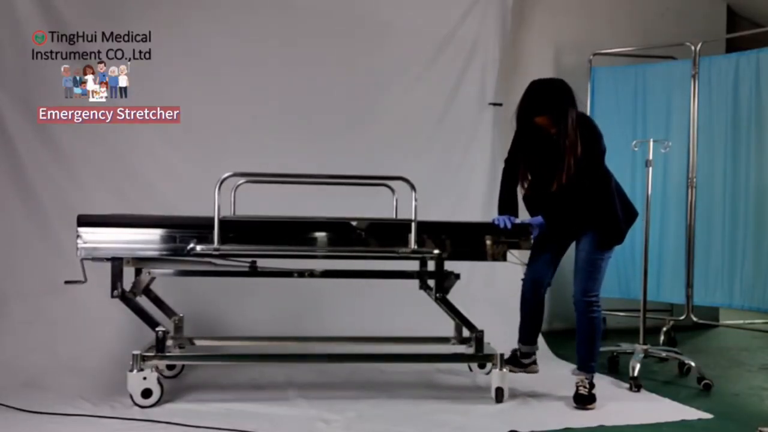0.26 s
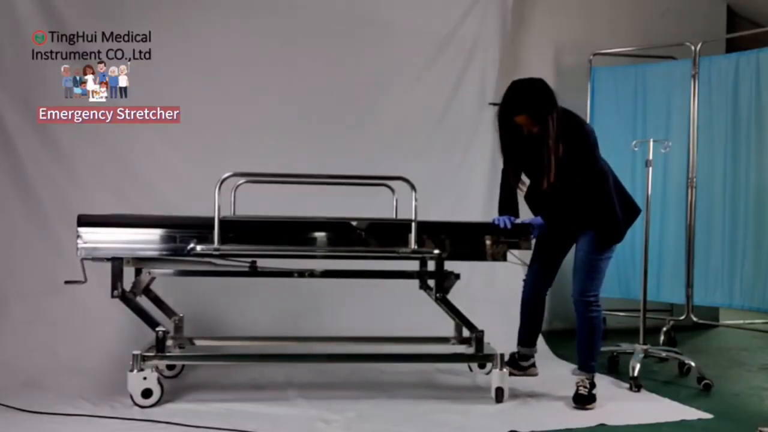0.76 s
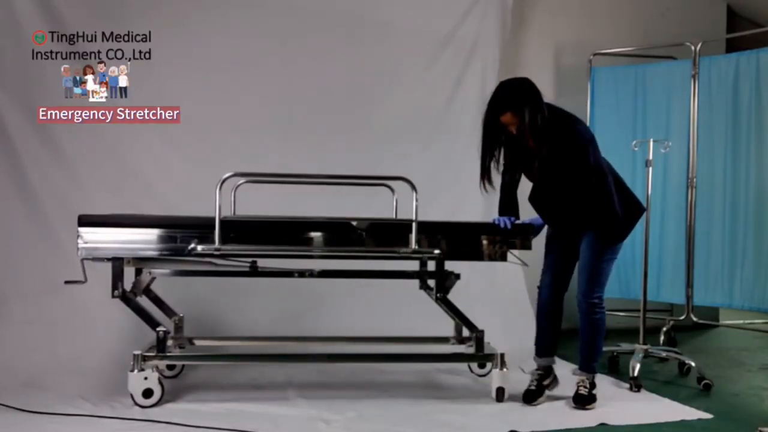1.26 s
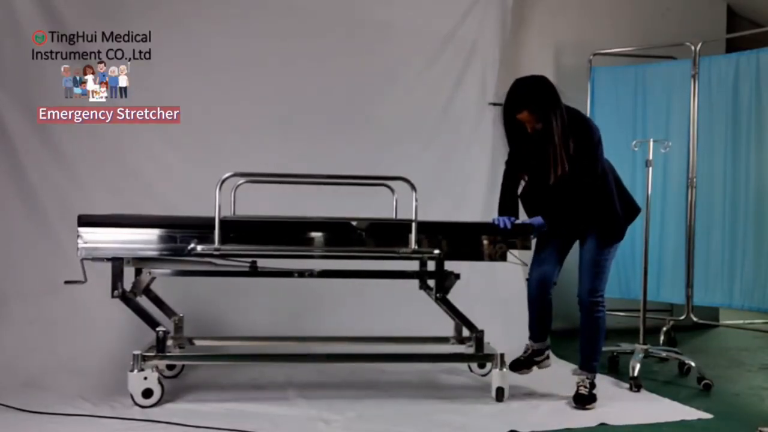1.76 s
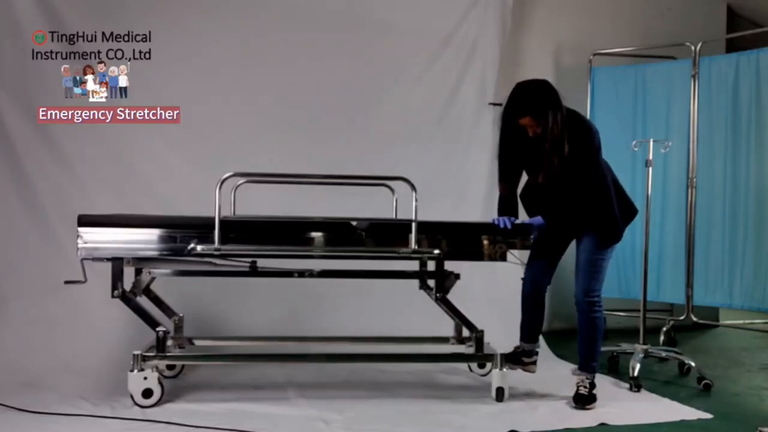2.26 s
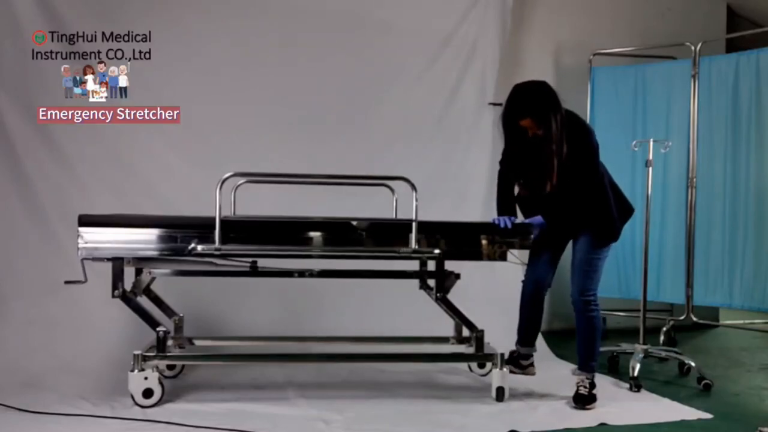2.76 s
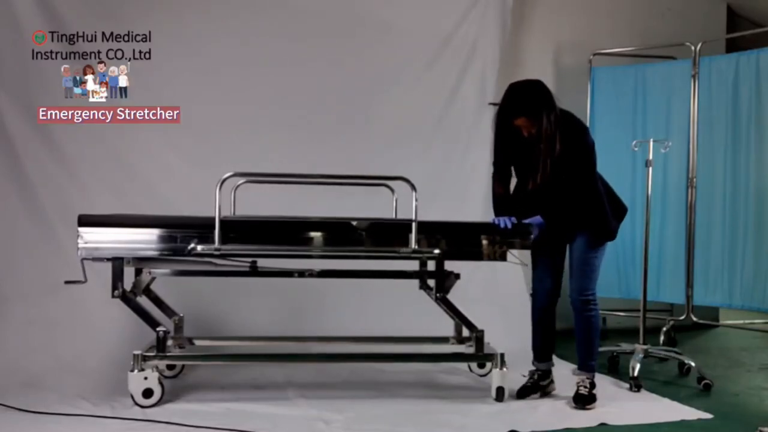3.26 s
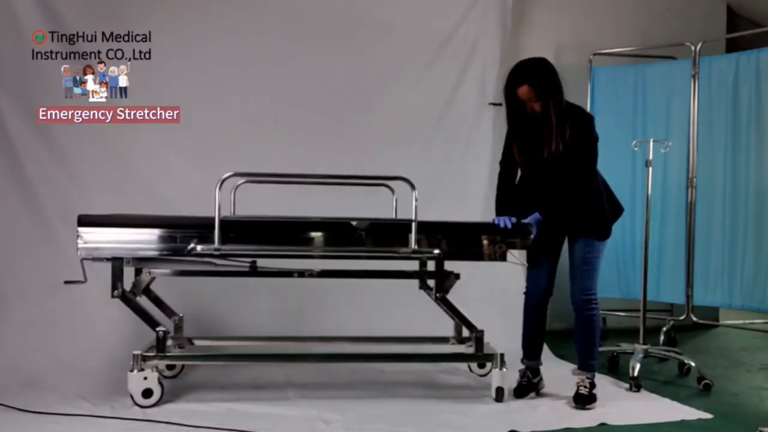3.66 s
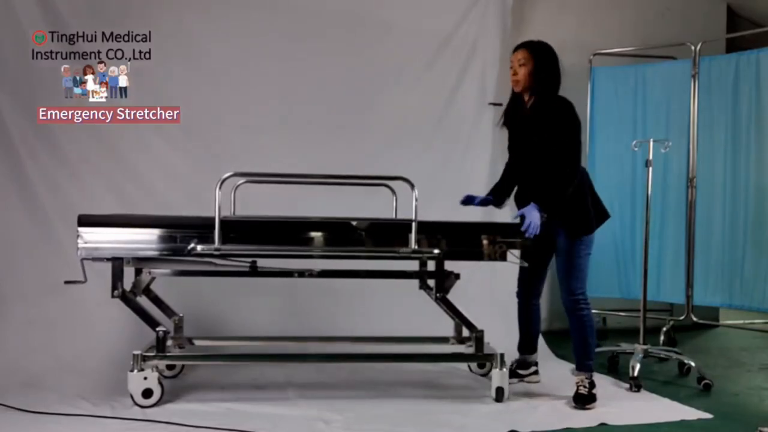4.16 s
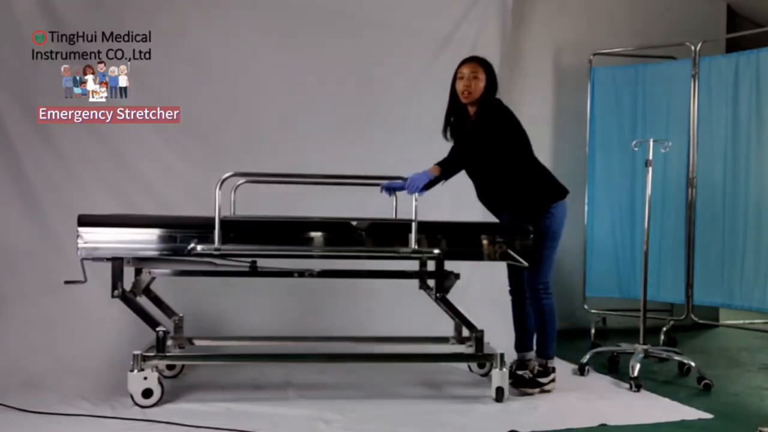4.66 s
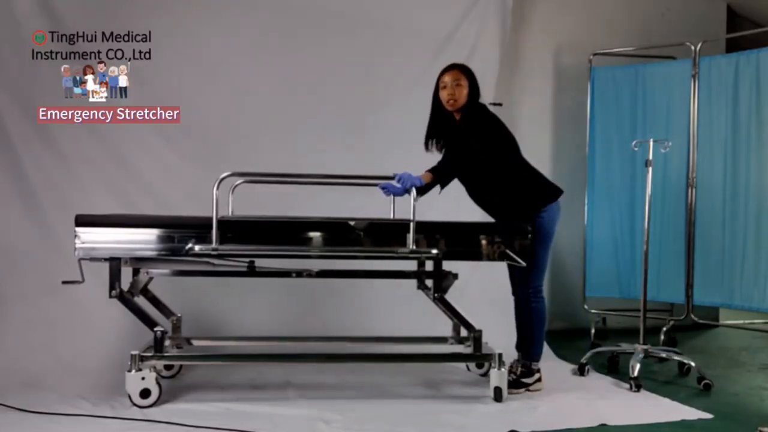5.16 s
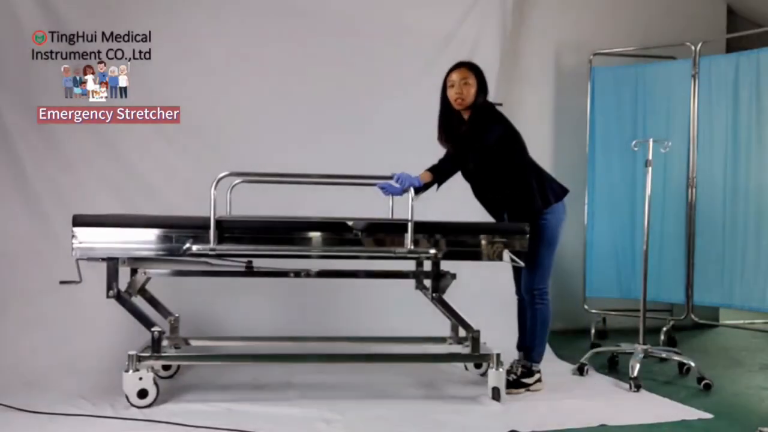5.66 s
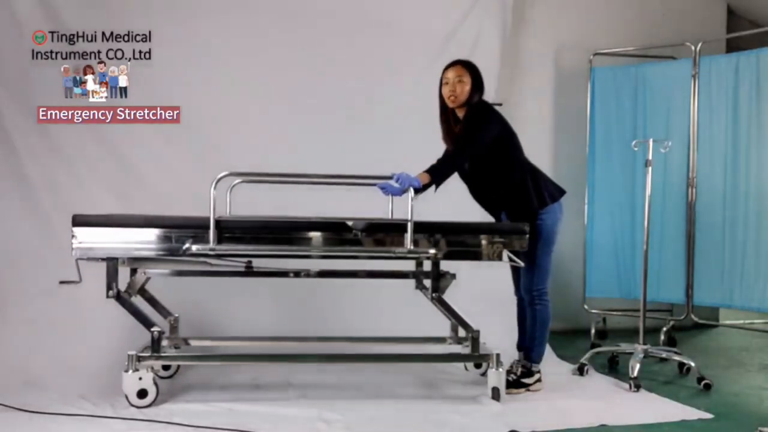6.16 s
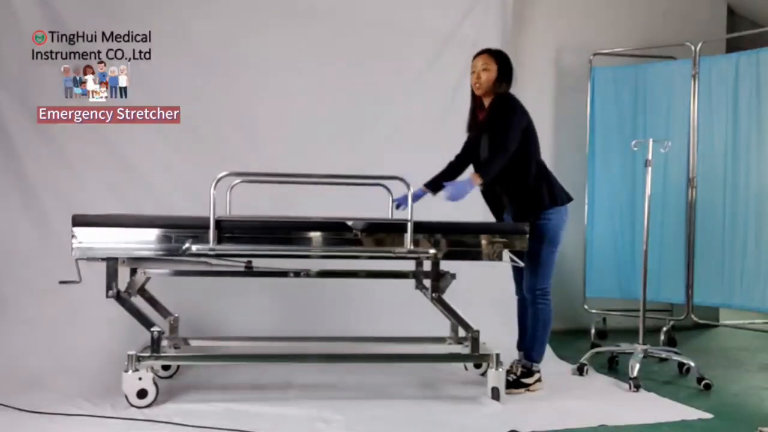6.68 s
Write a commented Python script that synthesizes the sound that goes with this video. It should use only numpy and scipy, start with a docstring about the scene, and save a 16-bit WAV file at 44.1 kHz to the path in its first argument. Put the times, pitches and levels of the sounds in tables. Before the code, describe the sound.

Sharp metallic brake clacks with loose chatter, two tiny glove squeaks, then a flurry of hollow steel rail knocks over soft room noise.

```python
"""Over quiet drifting room noise and a faint hum, a treble hiss swells and dies at the start.
Shoe and glove tick faintly on a steel stretcher; a foot lets its caster brake up, later presses it down.
A glove squeaks twice on the side rail, then a hand shakes it; a long frame tube rings, holds, drops quickly.
Blows are a crack, a noise rattle and decaying tube modes; loose parts are dense random impacts.
A bare room echoes them; the colours include a small microphone's peak near 8 kHz and weak bass."""
import sys
import numpy as np
from scipy import signal
from scipy.io import wavfile
from scipy.ndimage import uniform_filter1d

SR = 44100
rng = np.random.default_rng(int(sys.argv[2]) if len(sys.argv) > 2 else 0)


def master(y):
    """Save y as 16-bit WAV."""
    cut = np.clip(np.atleast_2d(y).T, -1, 1)
    pcm = np.round(cut * 32767)  # scale
    wavfile.write(sys.argv[1], SR, pcm.astype(np.int16))


def linear_from_db(decibels):
    """Turn decibels (scalar or array-like) into linear amplitude factors; 0 gives 1."""
    return 10 ** (np.asarray(decibels, float) / 20)


N = 305172

# brake pedal and light touches at the microphone, relative: freq_hz, density_db_per_hz
PRESS_COLOUR = [(59, -37.5), (100, -7.5), (240, 5), (343, 2.5), (481, -2.5), (634, 7), (854, 0.5),
                (1200, 5), (2370, 0), (3800, -7.5), (5770, -19), (8460, 3.5), (11000, -13), (14100, -12.5),
                (16000, -22)]
# steel tube modes, levels relative before tilt: centre_hz, level_db, t60_s
TUBE_MODES = [(307, -17.5, 0.073), (350, -20.5, 0.15), (846.4, -8, 0.23), (891.7, 0.5, 0.092),
              (1002.5, -10, 0.2), (1434, -1.5, 0.052), (1786, -23, 0.32), (2080, -3.5, 0.024),
              (2350, -28, 1), (4080, -21, 0.45), (6850, -13.5, 0.25), (7420, -14.5, 0.56), (7500, -9, 0.15),
              (8320, -9.5, 0.37), (8500, -20.5, 0.19), (8700, -20, 0.23), (13400, -24, 0.068)]


def evened(x):
    """Scales to rms 1."""
    return x / np.sqrt(np.mean(x ** 2) + 1e-20)


def read(points, hz):
    """Reads a spectrum on a log-frequency axis."""
    f, value = np.transpose(points)
    return np.interp(np.log(hz + 1), np.log(f + 1), value)


def add(mix, start_s, sound):
    """Mixes a sound in at start_s."""
    part = mix[round(start_s * SR):][:len(sound)]
    part += sound[:len(part)]


def wander(t, step_s, count):
    """Random values, linear between normal draws step_s apart."""
    return np.interp(t, np.arange(count) * step_s, rng.standard_normal(count))


def noise(colour, patchy_db):
    """Coloured noise from random short-time spectra with drifting patches, rms 1."""
    hz = np.fft.rfftfreq(1024, 1 / SR)
    real, imag, patches = rng.standard_normal((N // 256 + 5, 513, 3)).T
    patches = uniform_filter1d(patches, size=12, axis=0)
    patches = evened(uniform_filter1d(patches, size=14, axis=1))
    gain_db = read(colour, hz)[:, None] + patchy_db * patches
    spectra = (real + 1j * imag) * linear_from_db(gain_db)
    return evened(signal.istft(spectra, nperseg=1024, noverlap=768)[1][:N])


def room_noise():
    """Broadband air noise whose level drifts."""
    # air noise: freq_hz, density_db_per_hz
    air_colour = [(29, -65), (50, -38.5), (85, -4.5), (211, -4), (244, -3), (341, -11), (551, -8.5),
                  (637, -20), (735, -12), (957, -19), (1740, -25), (2690, -31.5), (5930, -37.5),
                  (7920, -21), (11500, -36.5), (15500, -40.5)]
    # air noise drift: time_s, level_db
    air_drift = [(0, -49.5), (.5, -53), (2.2, -53.5), (3.2, -59.5), (4.2, -55), (5, -56), (6.92, -53.5)]
    time_s, level_db = np.transpose(air_drift)
    return linear_from_db(np.interp(np.arange(N) / SR, time_s, level_db)) * noise(air_colour, patchy_db=0.7)


def machinery_hum():
    """Distant machinery: sines wavering quickly and slightly in level and phase."""
    # hum tones: freq_hz, mean_level_db
    hum_tones = [(549.1, -70), (729, -69), (850.6, -72.5)]
    t = np.arange(N) / SR
    out = np.zeros(N)
    for hz, db in hum_tones:
        level = linear_from_db(db + 1.3 * wander(t, 1 / 25, 300))
        cycles = hz * t + 0.073 * wander(t, 1 / 25, 300)
        out += level * np.sin(2 * np.pi * cycles)
    return out


def opening_hiss():
    """Treble noise: steady, swells, then fades."""
    # hiss: freq_hz, density_db_per_hz
    hiss_colour = [(1470, -20), (2500, -18), (3570, -24), (4800, -9.5), (5440, -23), (6550, -9.5),
                   (8330, 0.5), (9010, -6.5), (11600, -16.5), (15300, -21), (16000, -23)]
    steady_db, swell_db, fade_db_per_s = -60.5, 11, 39
    swell_s, peak_s = 0.11, 0.27
    t = np.arange(N) / SR
    swell = np.sqrt(np.clip((t - swell_s) / (peak_s - swell_s), 0, 1))
    level_db = steady_db + swell_db * swell - fade_db_per_s * np.maximum(t - peak_s, 0)
    return linear_from_db(level_db) * noise(hiss_colour, patchy_db=1.2)


def causal(db):
    """Minimum-phase response, energy 1, for gains in dB on 0..SR/2."""
    log_gain = np.log(linear_from_db(np.maximum(np.r_[db, db[-2:0:-1]], -90)))
    taps = np.fft.ifft(np.exp(log_gain - 1j * signal.hilbert(log_gain).imag)).real[:2048]
    return taps / np.linalg.norm(taps)


def room(tail_db=-7.5):
    """Direct sound, a few single echoes, then a noise tail that builds up and dies band by band."""
    # tail decay: freq_hz, t60_s
    tail_t60 = [(100, 3.24), (400, 0.96), (1500, 0.81), (3500, 0.81), (8000, 0.64), (11000, 0.45),
                (15000, 0.25)]
    # floor and wall echoes, relative to direct: delay_s, level_db
    echo_list = [(.0035, -10), (.008, -12), (.013, -12), (.021, -14)]
    t = np.arange(5 * SR // 4) / SR
    hz, frame_t, z = signal.stft(rng.standard_normal(len(t)), SR, nperseg=256)
    decay = linear_from_db(-60 * frame_t / read(tail_t60, hz)[:, None])
    tail = signal.istft(z * decay, SR, nperseg=256)[1][:len(t)]
    tail *= 1 - np.exp(-t / 0.009)
    out = linear_from_db(tail_db) * tail / np.linalg.norm(tail)
    out[0] = 1
    for delay_s, db in echo_list:
        out[round(delay_s * SR)] += linear_from_db(db) * rng.choice([-1, 1])
    return out


def ring(modes, tilt=0):
    """Half a second of struck modes; each is a close pair that beats, and each mode's level varies at random."""
    t = np.arange(SR // 2) / SR
    f, db, t60 = np.transpose(modes * 2)[:, :, None]
    detune, level_draw = rng.standard_normal((2, *f.shape))
    db = db + tilt * np.log2(f / 1000) + 1.5 * level_draw - 23
    pairs = linear_from_db(db - 60 * t / t60) * np.sin(2 * np.pi * f * (1 + 0.003 * detune) * t)
    thin = signal.butter(2, 200, "high", fs=SR, output="sos")  # the ringing keeps little below 200 Hz
    return signal.sosfilt(thin, pairs.sum(0)) * np.minimum(1, 5 - 10 * t)  # end fade


def blow(colour, rise_s, blow_db, tilt, ring_db, rattle_t60_s):
    """A crack and a dying rattle in the colour of the part struck, and the ringing tubes."""
    crack_db, crack_rise_s = 5.5, 0.0019
    t, hz = np.arange(SR // 2) / SR, np.fft.rfftfreq(4096, 1 / SR)
    onset = np.minimum(t / rise_s, 1)
    rattle = rng.standard_normal(len(t)) * linear_from_db(-60 * t / rattle_t60_s) * onset
    rattle = linear_from_db(7.5) * rattle / np.linalg.norm(rattle)
    rattle[0] += linear_from_db(crack_db) * np.exp(-rise_s / crack_rise_s)  # slower rise, weaker crack
    response = causal(read(colour, hz) + tilt * np.log2(hz / 2000 + 0.01))
    body = signal.fftconvolve(rattle, response)[:len(t)]
    return linear_from_db(blow_db) * (body + linear_from_db(ring_db) * onset * ring(TUBE_MODES, tilt))


def add_blows(mix, table, colour):
    """Softer blows rise more slowly; each meets its own draw of the room."""
    hardest_rise_s, softening = 0.0013, 1.2  # softening: dB of longer rise per dB softer
    hardest_db = max(row[1] for row in table)
    for start_s, db, *how in table:
        rise_s = hardest_rise_s * linear_from_db(softening * (hardest_db - db))
        add(mix, start_s, signal.fftconvolve(blow(colour, rise_s, db, *how), room()))


def touches(mix):
    """Faint ticks of shoe and glove on the frame."""
    # ticks, levels relative: start_s, level_db, tilt_db_per_octave, tube_ring_db, rattle_t60_s
    tick_blows = [(.415, -42, -0.13, 1, 0.055), (.455, -36, -1.7, -27, 0.032), (2.77, -43, -1.3, -4, 0.024),
                  (4.75, -40, -1.2, -27, 0.083)]
    add_blows(mix, tick_blows, PRESS_COLOUR)


def chatter(colour, hold_s, start_db, sag, treble_db):
    """Dense tiny impacts of uneven size among the loose parts; treble thins first, then all settles."""
    treble_sag_db_per_s, top_sag_db_per_s, settle_db_per_s = 69.5, 44.5, 243
    rise_s, clump_db, impacts_per_s = 0.012, 1.1, 3500
    t, hz = np.arange(SR // 2) / SR, np.fft.rfftfreq(4096, 1 / SR)
    level_db = start_db - sag * t - settle_db_per_s * np.maximum(t - hold_s, 0)
    level_db = level_db + clump_db * wander(t, 1 / 100, 51)  # clumps of about 10 ms
    bright_db = treble_db - treble_sag_db_per_s * np.minimum(t, hold_s)
    chance, size = rng.random((len(t), 2)).T
    sign = np.sign(chance * SR % 2 - 1)
    taps = (chance < impacts_per_s / SR) * linear_from_db(-2.2 * np.log(size + 4e-3)) * sign
    struck = linear_from_db(-39.5) * ring(TUBE_MODES)
    add(struck, 0, causal(read(colour, hz)))
    full = evened(signal.oaconvolve(taps, struck)[:len(t)])
    low = signal.sosfilt(signal.butter(4, 5500, fs=SR, output="sos"), full)
    high = signal.sosfilt(signal.butter(4, [5500, 10500], "band", fs=SR, output="sos"), full)
    top = signal.sosfilt(signal.butter(4, 10500, "high", fs=SR, output="sos"), full)
    high = high + linear_from_db(-top_sag_db_per_s * t) * top  # the top thins faster still
    return linear_from_db(level_db) * (low + linear_from_db(bright_db) * high) * np.minimum(t / rise_s, 1)


def add_chatter(mix, table, colour):
    """Loose parts chatter on after a stroke, each run in its own draw of the room."""
    for start_s, *how in table:
        response = linear_from_db(-4) * room(tail_db=-11.5)
        add(mix, start_s, signal.fftconvolve(chatter(colour, *how), response))


def brake_release(mix):
    """The brake pedal springs up and bounces; its loose parts chatter."""
    # blows, levels relative: start_s, level_db, tilt_db_per_octave, tube_ring_db, rattle_t60_s
    release_blows = [(1.384, -29, -3, -14, 0.0086), (1.3895, -2, 0, -16.5, 0.027),
                     (1.3995, -10.5, 1.5, -33, 0.06), (1.418, -16.5, -3.5, -2, 0.22)]
    # blow spectrum at the microphone, relative: freq_hz, density_db_per_hz
    release_colour = [(59, -43.5), (100, -36.5), (210, -12.5), (705, -11.5), (950, -10.5), (1080, -12),
                      (2690, -2.5), (3900, -4), (5900, -18.5), (8640, 2), (13800, -20), (16000, -18.5)]
    # chatter, levels relative: start_s, hold_s, level_db, sag_db_per_s, initial_treble_db
    release_chatter = [(1.4, 0.23, -22, 1, 9)]
    # chatter spectrum, relative: freq_hz, density_db_per_hz
    chatter_colour = [(59, -57), (100, -18.5), (210, -5), (373, -13.5), (492, -13.5), (1060, -11.5),
                      (1390, -5.5), (1580, -10), (2690, -3.5), (3900, -8.5), (5530, -26), (8280, 0),
                      (10500, -17.5), (13500, -13.5), (16000, -31)]
    add_blows(mix, release_blows, release_colour)
    add_chatter(mix, release_chatter, chatter_colour)


def brake_press(mix):
    """The brake pedal is pressed down and latches; its loose parts chatter."""
    # blows, levels relative: start_s, level_db, tilt_db_per_octave, tube_ring_db, rattle_t60_s
    press_blows = [(3.332, -31, -6, -20, .012), (3.3379, -4.5, 1, -6.5, 0.015),
                   (3.3748, -6.5, -1, -27, 0.022), (3.432, -12.5, -3, -14, 0.098),
                   (3.5215, -7, -1.5, -20, 0.079)]
    # chatter, levels relative: start_s, hold_s, level_db, sag_db_per_s, initial_treble_db
    press_chatter = [(3.342, 0.19, -21, 42.8, -1.5), (3.525, .07, -23.5, 91, -13)]
    add_blows(mix, press_blows, PRESS_COLOUR)
    add_chatter(mix, press_chatter, PRESS_COLOUR)


def squeak(hz, db, length_s):
    """A short tone of unsteady pitch."""
    size = int(length_s * SR)
    wobble = 1 + 0.16 * uniform_filter1d(rng.standard_normal(SR // 8), size=300)[:size]
    return linear_from_db(db) * np.sin(2 * np.pi * np.cumsum(hz * wobble) / SR) * np.hanning(size)


def glove_squeaks(mix):
    """A glove squeaks on the rail."""
    # squeaks: start_s, mean_pitch_hz, level_db, length_s
    squeak_list = [(4.765, 2365, -64, 0.039), (4.837, 2970, -61, 0.026)]
    for start_s, *how in squeak_list:
        add(mix, start_s, signal.fftconvolve(squeak(*how), room()))


def side_rail(mix):
    """The shaken side rail knocks in its sockets; loose parts chatter."""
    # blows, levels relative: start_s, level_db, tilt_db_per_octave, tube_ring_db, rattle_t60_s
    rail_blows = [(5.071, -14.5, -7.5, 5, 0.04), (5.081, -3.5, -2.25, -0.5, 0.21),
                  (5.196, -4.5, -3.5, 1, 0.3), (5.2185, 2.5, 0.4, -2.5, 0.1),
                  (5.247, -3.5, -3.5, 2.5, 0.13), (5.278, -1.5, -2.5, -5.5, 0.33),
                  (5.3553, 3, -2.1, -12, 0.2), (5.501, -9, -4, 6, 0.12), (5.527, 0.5, -0.6, -0.5, 0.11),
                  (5.549, -11, -2, -16, 0.025), (5.6317, -1, -0.95, -6.5, 0.054),
                  (5.653, -17, 0, -4, 0.029), (5.85, -17.5, -2.8, 3, 0.11), (6.006, -21.5, -3, 3.5, 0.033),
                  (6.0155, 2, 1, 0, 0.13), (6.11, -8, -4, 3.5, 0.71), (6.275, -17, -2.7, -7, 0.14),
                  (6.336, -21, -3, 4, 0.016), (6.3453, -0.5, -0.9, -12.5, 0.086),
                  (6.876, -17.5, -5.5, 5, 0.23)]
    # blow spectrum at the microphone, relative: freq_hz, density_db_per_hz
    rail_colour = [(76, -36), (130, -37), (285, -7.5), (565, -9.5), (1010, -3), (1120, -9.5), (1430, -7),
                   (4150, -17.5), (5850, -24.5), (8570, -1.5), (11600, -18), (13100, -7.5), (16000, -24)]
    # chatter, levels relative: start_s, hold_s, level_db, sag_db_per_s, initial_treble_db
    rail_chatter = [(5.09, 0.088, -27.5, 31, -6), (5.23, 0.285, -22.5, 3.7, 1.5),
                    (5.53, 0.15, -23.5, 4.8, -17), (6.025, 0.17, -22.5, 18, -1),
                    (6.352, 0.04, -17.5, 157, -11.5)]
    # chatter spectrum, relative: freq_hz, density_db_per_hz
    rail_chatter_colour = [(35, -62), (60, -22.5), (274, -1.5), (417, -6.5), (492, -8.5), (732, -4),
                           (1010, -2.5), (1140, -6.5), (2350, -9), (5860, -26.5), (7940, -0.5),
                           (13300, -37), (16000, -32)]
    add_blows(mix, rail_blows, rail_colour)
    add_chatter(mix, rail_chatter, rail_chatter_colour)


def long_tube(db, hold_s):
    """The long tube swings up after a knock, rings and flutters, then drops away quickly."""
    # near-harmonic modes, levels relative: centre_hz, level_db, t60_s (before the drop)
    long_modes = [(491, -10, 3.1), (1029.6, -2, 0.33), (1567, -13, 0.73), (1973, -17, 0.56)]
    rise_s, drop_db_per_s, flutter_db = 0.013, 400, 2.5
    t = np.arange(SR // 2) / SR
    level_db = db + flutter_db * wander(t, 1 / 60, 31)
    level_db = level_db - drop_db_per_s * np.maximum(t - hold_s, 0)
    return linear_from_db(level_db) * np.minimum(t / rise_s, 1) * ring(long_modes)


def long_tube_knocks(mix):
    """Some knocks reach the long frame tube."""
    # knocks, levels relative: start_s, level_db, hold_s
    knock_list = [(5.2183, -5.5, 0.11), (5.527, -7, 0.16), (6.02, 1.5, 0.164)]
    for start_s, *how in knock_list:
        add(mix, start_s, signal.fftconvolve(long_tube(*how), room(tail_db=-10.5)))


def scene():
    """All sources summed, the same on both channels."""
    mix = room_noise() + machinery_hum() + opening_hiss()
    for source in (touches, brake_release, brake_press, glove_squeaks, side_rail, long_tube_knocks):
        source(mix)
    return np.array([mix, mix])


def low_pass(x):
    """Removes everything above the highest recorded frequency."""
    return signal.sosfilt(signal.butter(12, 16620, fs=SR, output="sos"), x)


def record(dry):
    """The microphone drops the deep bass; a linear-phase low-pass limits the band."""
    bass_cut_hz, edge_hz = 85, 15750
    thin = signal.sosfilt(signal.butter(2, bass_cut_hz, "high", fs=SR, output="sos"), dry)
    edge = signal.firwin(301, edge_hz, window=("kaiser", 5), fs=SR)
    finished = signal.oaconvolve(thin, edge[None], "same")
    return low_pass(finished)


dry = scene()
out = record(dry)
master(out)
```